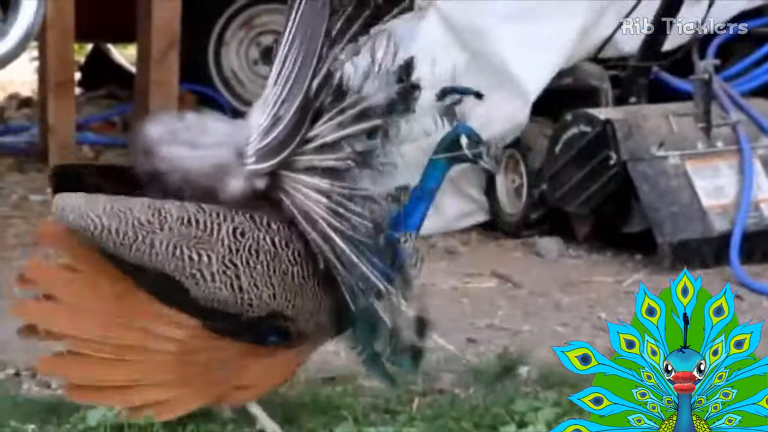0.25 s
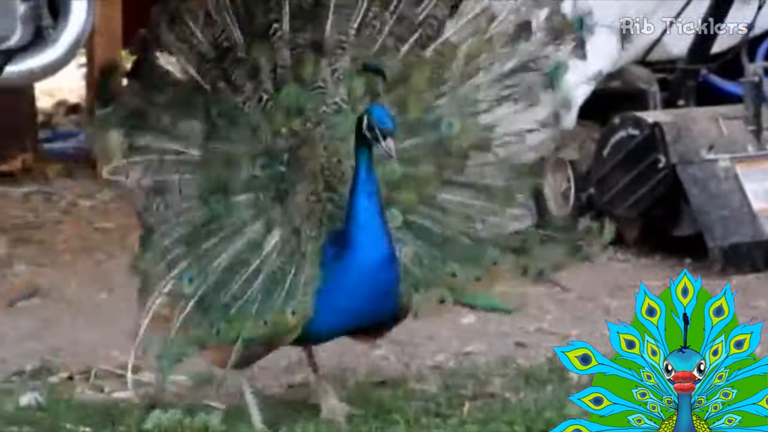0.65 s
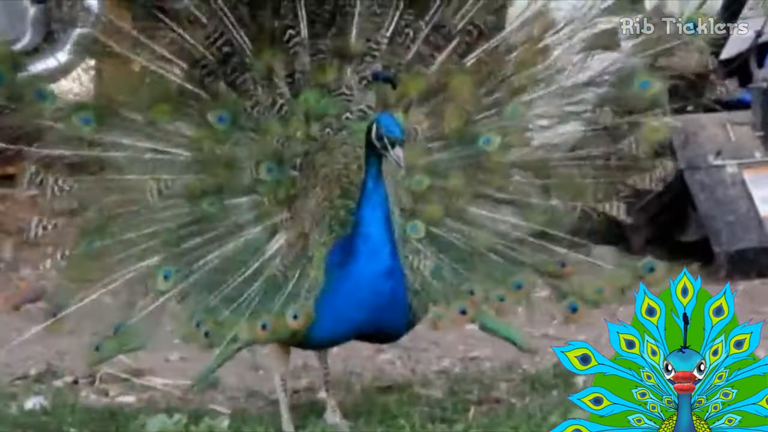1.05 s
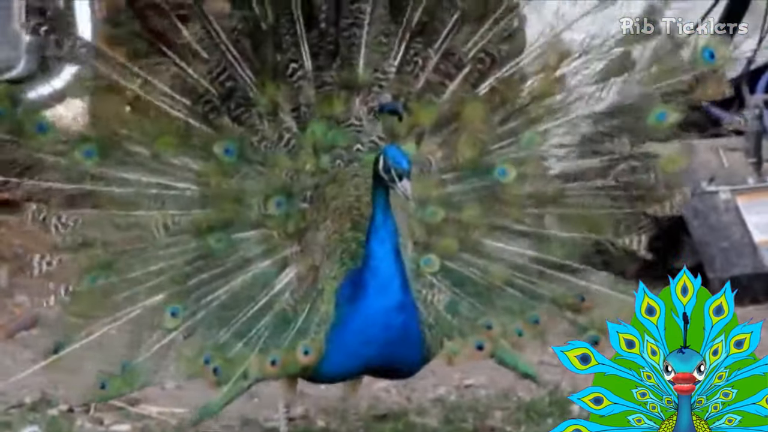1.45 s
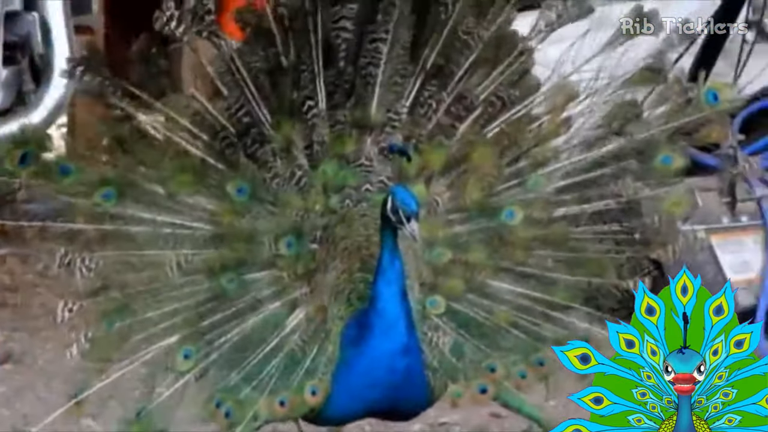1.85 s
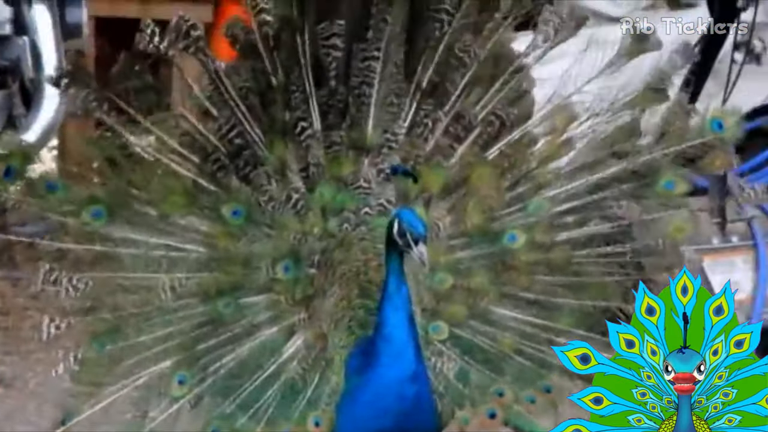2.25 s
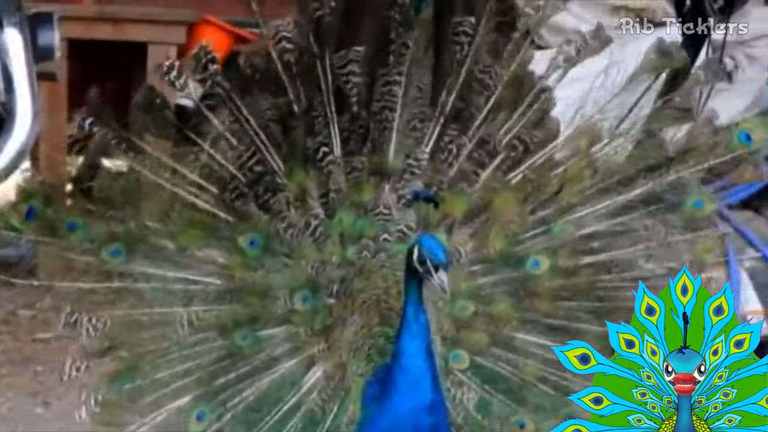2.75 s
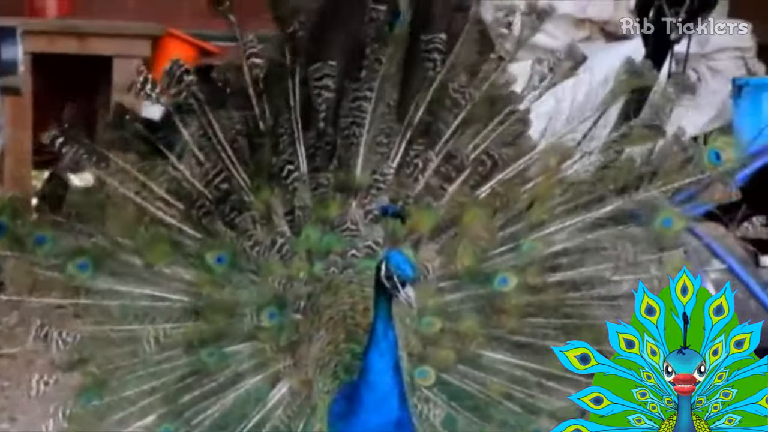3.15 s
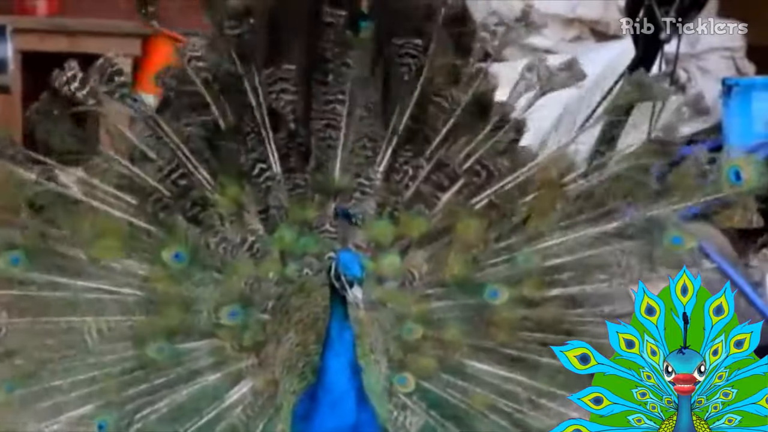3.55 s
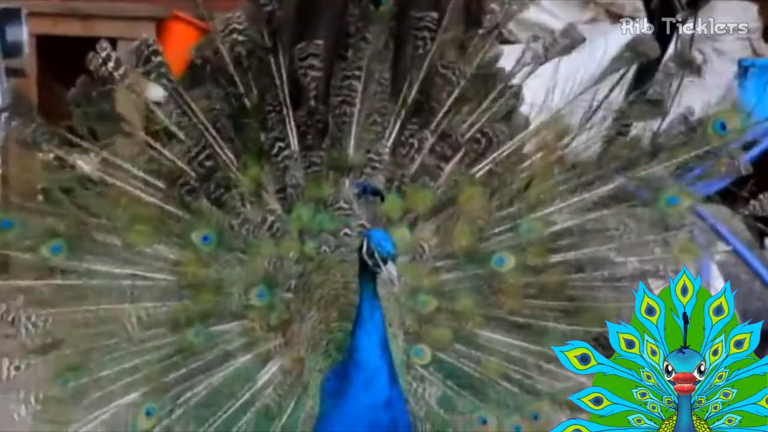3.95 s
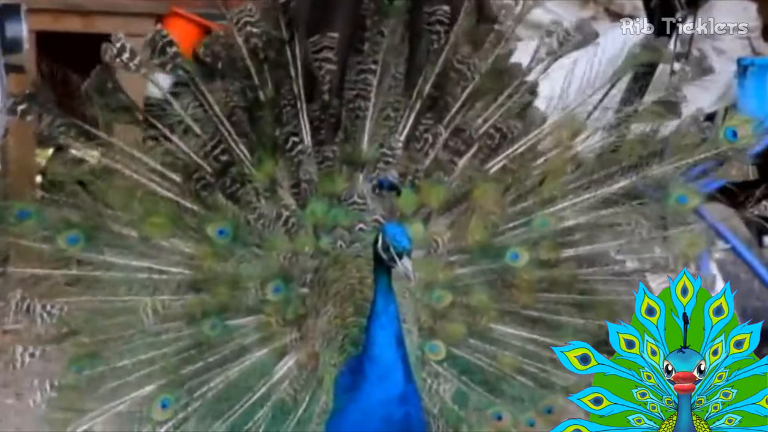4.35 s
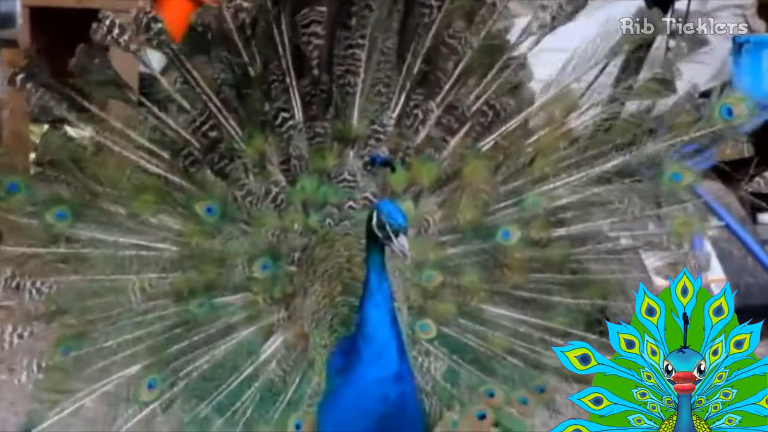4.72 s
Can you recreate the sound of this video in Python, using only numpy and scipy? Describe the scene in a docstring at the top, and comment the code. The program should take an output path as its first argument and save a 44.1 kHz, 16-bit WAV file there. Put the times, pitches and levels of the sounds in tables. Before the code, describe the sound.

A peacock rustles and knocks its feathers as it turns, then shivers its raised train in a dry, hissing, rattling shimmer, heard almost entirely on the left.

```python
"""Peacock shivering his train

A peacock swings round in a yard, brushing and fluttering his feathers, then shivers his raised train.
Shafts patter and barbs hiss, built from thousands of random tiny impacts a second that follow his effort;
a close reflection hollows the rustle, lower as he steps nearer. Quills knock and tick as damped pulses.
Filtered noise makes the open air and the waft of the fan; wavering sines make a faint hum and a far bird.
Nearly all of it sits on the left, over hiss in both channels."""
import sys
import numpy as np
from scipy import signal
from scipy.fft import rfft, irfft, next_fast_len
from scipy.io import wavfile
from scipy.ndimage import uniform_filter1d, map_coordinates

SR = 44100
rng = np.random.default_rng(int(sys.argv[2]) if len(sys.argv) > 2 else 0)


def pcm_store(signal):
    """Save signal as 16-bit PCM."""
    levels = np.round(np.clip(np.atleast_2d(signal), -1, 1) * 32767)
    wavfile.write(sys.argv[1], SR, levels.astype(np.int16).T)


N = 219822
T = np.arange(N) / SR  # time in seconds


def undb(db):
    """Turn decibels into gain."""
    return 10 ** (np.asarray(db) / 20)


def unit(x):
    """Scale to rms 1."""
    return x / np.sqrt(np.mean(x ** 2))


def curve(rows):
    """Join (time_s, value) points by straight lines."""
    time_s, value = np.transpose(rows)
    return np.interp(T, time_s, value)


def ramp(start_s, rise_s):
    """Climb from 0 to 1 in a straight line, then hold."""
    return np.clip((T - start_s) / rise_s, 0, 1)


def colour(x, points):
    """Shape a spectrum by (pitch_hz, level_db) points joined over log frequency; rms 1."""
    point_hz, point_db = np.transpose(points)
    size = next_fast_len(N)
    bin_hz = np.maximum(np.fft.rfftfreq(size, 1 / SR), 1)
    gain = undb(np.interp(np.log(bin_hz), np.log(point_hz), point_db))
    return unit(irfft(rfft(x, size) * gain, size)[:N])


def split(x, hz):
    """Part a sound into what lies below and above a frequency."""
    lowpass = signal.butter(N=4, Wn=hz, fs=SR, output="sos")
    low = signal.sosfiltfilt(lowpass, x)
    return low, x - low


def walk(rate_hz):
    """Smooth random drift of rms 1: random steps at the given rate, averaged twice."""
    size = int(SR / rate_hz)
    steps = np.repeat(rng.standard_normal(N // size + 1), size)
    smooth = uniform_filter1d(uniform_filter1d(steps, size), size)
    return unit(smooth[:N])


def contacts(per_s, spread_db):
    """Tiny impacts at random moments, most weak and a few strong."""
    happens = rng.random(N) < per_s / SR
    strength = undb(spread_db * np.minimum(rng.exponential(size=N), 5))
    return unit(happens * strength * rng.choice([-1, 1], N))


# spectrum of the open air: pitch_hz, level_db (relative)
AIR_SPECTRUM = [(30, -3), (90, 25.5), (200, 9), (600, 18.5), (1500, 15), (3000, -12), (6000, -16),
                (12000, -56)]
HUM_HZ = 152.3
# the hum comes forward near the end
HUM_DB, HUM_SWELL_DB, HUM_SWELL_S, HUM_RISE_S = -58.5, 5.5, 4.06, 0.35


def yard(air_db=-53, drift_db=2.0, waver_db=1.8):
    """Open air as drifting coloured noise, and a motor hum as one sine of wavering pitch and level."""
    air = colour(rng.standard_normal(N), AIR_SPECTRUM) * undb(air_db + drift_db * walk(2.54))
    hum_hz = HUM_HZ * (1 + 0.025 * walk(30))
    hum = unit(np.sin(2 * np.pi * np.cumsum(hum_hz) / SR))
    hum_db = HUM_DB + HUM_SWELL_DB * ramp(HUM_SWELL_S, HUM_RISE_S) + waver_db * walk(10)
    return air + hum * undb(hum_db)


# feathers brushing as he turns: peak_s, rise_s, fade_s, level_db, treble_db (added above the split)
BRUSH_STROKES = [(.004, 0.01, 0.017, -26, 3), (.1, 0.14, 0.078, -36.5, 4), (0.176, 0.014, 0.037, -28, 6),
                 (.298, 0.041, 0.037, -32.5, -4.5), (0.478, 0.024, 0.0057, -34.5, -2),
                 (0.522, 0.019, 0.025, -29.5, 1), (0.606, 0.0054, 0.047, -31.5, 2.5),
                 (0.661, 0.0027, 0.008, -29.5, 8.5), (.742, 0.076, 0.036, -30, 0.5),
                 (0.79, 0.0063, 0.021, -31.5, 1)]
# spectrum of the brushing: pitch_hz, level_db (relative)
BRUSH_SPECTRUM = [(100, 1.5), (220, 4.5), (400, 3.5), (700, 0.5), (1500, -3), (2400, -4), (3300, -8),
                  (4800, -13.5), (7000, -10.5), (9500, -12.5), (13000, -55)]


def brushes(per_s=12000, spread_db=3.0):
    """Feathers slide over each other in short crackling strokes of dense contacts."""
    body, edge = split(colour(contacts(per_s, spread_db), BRUSH_SPECTRUM), 3650)
    body_power, edge_power = 0, 0
    for s, rise, fade, db, treble_db in BRUSH_STROKES:
        stroke = undb(db) * np.exp(-np.maximum((s - T) / rise, (T - s) / fade))
        body_power = body_power + stroke ** 2
        edge_power = edge_power + (stroke * undb(treble_db)) ** 2
    return body * np.sqrt(body_power) + edge * np.sqrt(edge_power)


def snap(s, db, hz, cycles):
    """One contact on a light, well damped quill: a brief cosine pulse under a bell-shaped envelope."""
    out = np.zeros(N)
    near = np.abs(T - s) < .01
    turns = hz * (T[near] - s)
    out[near] = -undb(db) * np.exp(-(turns / cycles) ** 2) * np.cos(2 * np.pi * turns)
    return out


# quills knocking together as the train swings up: peak_s, peak_db (before the dulling filter),
# pitch_hz, ring_cycles
QUILL_KNOCKS = [(.1771, -20, 900, .5), (0.2655, -4.5, 1700, .2), (0.2676, -13.5, 700, .25),
                (.3076, -26.5, 1500, .4), (.61, -24, 302, 0.37), (.634, -31, 520, 1.2),
                (.6697, -25, 1200, .3), (.688, -22, 260, 0.38), (.704, -25, 514, 0.55),
                (.731, -29, 600, 0.8), (0.738, -16, 500, 0.6), (.742, -29, 1000, .7), (0.75, -29, 260, 0.5),
                (0.7567, -24, 290, 0.6), (0.7702, -28, 300, 0.35), (0.7812, -12.5, 1300, 0.2),
                (0.7822, -17.5, 480, 0.52), (0.7918, -23, 700, 0.3), (.811, -44, 600, 0.42)]
# the sharpest ticks of feather tips: peak_s, peak_db, pitch_hz
TIP_TICKS = [(0.175, -13, 6690), (0.523, -27, 7090), (.6074, -29, 5970), (0.659, -27, 8850),
             (0.66, -25, 6600), (1.4809, -22, 5930), (1.8172, -19, 6060), (2.0818, -21, 6120),
             (2.6755, -15, 5880), (2.7484, -17, 7200), (2.8263, -13, 6400), (2.8654, -22, 5560),
             (3.095, -22, 6000), (3.3266, -16, 5790), (3.599, -14, 6000), (3.6387, -10, 6230),
             (3.6752, -13.5, 5580), (3.7157, -17, 5510), (3.7392, -22, 6120), (4.2611, -27, 5980),
             (4.6057, -20, 6300), (4.611, -21, 6170)]
# spectrum of the train's feathers, for tip chatter and for the shiver: pitch_hz, level_db (relative)
TRAIN_SPECTRUM = [(60, -9), (150, -4), (260, -4), (380, -2.5), (900, -2.5), (1700, -0.5), (2300, 0.44),
                  (3200, 0.5), (4400, 1.8), (6200, 3), (7300, -1.5), (8500, -4), (9700, -7.5),
                  (10400, -21.5), (11000, -37), (13000, -35)]
TICK_CYCLES = 1
KNOCK_TOP_HZ = 4240  # a knock is steeply dulled above this


def quills(chatter_db=-12, chatter_s=0.00095):
    """Thick bases knock dully, each at its own pitch; thin tips tick and chatter briefly as they rebound."""
    dull = signal.butter(N=12, Wn=KNOCK_TOP_HZ, fs=SR, output="sos")
    knocks = signal.sosfiltfilt(dull, sum(snap(*knock) for knock in QUILL_KNOCKS))
    ticks = sum(snap(s, db, hz, TICK_CYCLES) for s, db, hz in TIP_TICKS)
    rebound = sum(undb(db) * (T > s) * np.exp(-np.abs(T - s) / chatter_s) for s, db, _ in TIP_TICKS)
    chatter = unit(split(colour(contacts(8800, 5.2), TRAIN_SPECTRUM), 4200)[1])
    return knocks + ticks + undb(chatter_db) * rebound * chatter


# wing and tail vanes flapping in the air: peak_s, flap_rate_hz, level_db
VANE_FLUTTERS = [(.281, 240, -38.5), (.316, 253, -33), (.385, 250, -47), (0.452, 238, -46), (.51, 170, -41),
                 (.686, 117.5, -39.5), (.762, 219.7, -32), (3.58, 278, -37.5)]
FLUTTER_CYCLES = 4.6  # flaps from the height of a flutter until it has fallen to 1/e


def flutters(uneven=0.131, overtone=0.15):
    """A vane flaps for a few uneven cycles: a soft low purr of four harmonics."""
    clock = np.cumsum(1 + uneven * walk(150)) / SR  # time that hurries and lags
    out = np.zeros(N)
    for s, hz, db in VANE_FLUTTERS:
        half = FLUTTER_CYCLES / hz
        near = np.abs(T - s) < 4 * half
        phase = 2 * np.pi * hz * clock[near]
        flap = unit(sum(overtone ** k * np.cos(k * phase) for k in range(1, 5)))
        out[near] += undb(db) * flap * np.exp(-((T[near] - s) / half) ** 2)
    return out


# the hollow a close reflection cuts, sinking as he steps nearer: time_s, hollow_hz
HOLLOW_PATH = [(1.0, 3450), (2.6, 3100), (4.6, 3000)]
REFLECTION_DB = -7


def reflected(x):
    """Add an echo half a cycle late at the hollow's frequency, so it partly cancels the sound there."""
    delay_s = .5 / curve(HOLLOW_PATH)
    echo = map_coordinates(x, [(T - delay_s) * SR], order=3, mode="nearest")
    return x + undb(REFLECTION_DB) * echo


# how hard he shivers the train: time_s, level_db (before the shaft and barb gains)
SHIVER_EFFORT = [(0.8, -41.5), (0.93, -36.5), (1.08, -37.5), (1.32, -38.7), (1.66, -37.5), (1.8, -37.5),
                 (2.34, -41.5), (2.65, -35), (2.87, -39.5), (3.04, -38.5), (3.11, -36), (3.18, -39),
                 (3.23, -41), (3.275, -37), (3.335, -36.5), (3.375, -38.5), (3.46, -37), (3.54, -37),
                 (3.63, -33), (3.76, -37.5), (3.81, -43.5), (3.85, -41.5), (3.93, -43.5), (4.0, -49.5),
                 (4.08, -47.5), (4.19, -53.5), (4.27, -50), (4.49, -44), (4.55, -39), (4.78, -42.5),
                 (4.9, -43.5), (4.98, -37.5)]
SHIVER_START_S, SHIVER_RISE_S = 0.63, 0.18


def shiver(beat_hz=26.57, wander=.012, harmonic_depths=(0.046, 0.047, 0.046),
           per_s=12000, spread_db=1.82, violence=0.13, barb_db=5.5, shaft_db=3,
           shaft_growth=0.038, shaft_patchy_db=0.5, barb_patchy_db=1.0):
    """The train swings to and fro; its feathers clash hardest once a swing, with fainter ripples between."""
    phase = 2 * np.pi * np.cumsum(beat_hz * (1 + wander * walk(2.2))) / SR
    swing = 1 + sum(depth * np.cos(k * phase) for k, depth in enumerate(harmonic_depths, 1))
    effort_db = curve(SHIVER_EFFORT)
    # the harder he shakes, the more single contacts stand out and the more the shafts join in
    extra_db = effort_db - np.median(effort_db)
    spread = spread_db + violence * extra_db
    # stiff shafts give the low patter, fine barbs the hiss
    shaft_hits = colour(contacts(per_s / 2, spread) * swing, TRAIN_SPECTRUM)
    barb_hits = colour(contacts(per_s, spread) * swing, TRAIN_SPECTRUM)
    shafts = unit(reflected(split(shaft_hits, 2780)[0]))
    barbs = unit(reflected(split(barb_hits, 2760)[1]))
    shafts *= undb(shaft_db + shaft_growth * extra_db + shaft_patchy_db * walk(35.02))
    barbs *= undb(barb_db + barb_patchy_db * walk(220))
    return (shafts + barbs) * undb(effort_db) * ramp(SHIVER_START_S, SHIVER_RISE_S)


# spectrum of the air the opening fan pushes aside: pitch_hz, level_db (relative)
WAFT_SPECTRUM = [(60, -25), (130, -7), (220, -1), (380, -3), (600, -17), (1200, -33), (3000, -70)]
WAFT_S, WAFT_RISE_S, WAFT_FADE_S, WAFT_DB = 0.765, .04, .2, -37


def waft():
    """A soft low rush of noise as the train comes upright, dying away as it settles."""
    swell = np.exp(-np.maximum((WAFT_S - T) / WAFT_RISE_S, (T - WAFT_S) / WAFT_FADE_S))
    return undb(WAFT_DB) * swell * colour(rng.standard_normal(N), WAFT_SPECTRUM)


# a far bird's notes: start_s, length_s, first_pitch_hz, last_pitch_hz, level_db (before roughness and echoes)
BIRD_NOTES = [(4.19, .14, 1045, 1055, -52.5), (4.67, .31, 745, 815, -47.3)]


def far_bird(waver=0.0109, rough_db=4.0, echo_s=.015, echo_db=-9):
    """Hoarse thin notes bend upwards; distance takes their overtones and scattered echoes blur them."""
    out = np.zeros(N)
    wobble = 1 + waver * walk(160)
    for s, length, first_hz, last_hz, db in BIRD_NOTES:
        along = np.clip((T - s) / length, 0, 1)
        hz = (first_hz + (last_hz - first_hz) * along) * wobble
        swell = np.sqrt(2 * np.abs(np.sin(np.pi * along)))
        out += undb(db) * swell * np.sin(2 * np.pi * np.cumsum(hz) / SR)
    out *= unit(undb(rough_db * walk(110)))
    echoes = rng.standard_normal(N) * np.exp(-T / echo_s)
    echoes /= np.linalg.norm(echoes)
    return out + undb(echo_db) * signal.fftconvolve(out, echoes)[:N]


def place(x, right_db):
    """Full on the left, faint on the right."""
    return np.array([x, undb(right_db) * x])


def scene():
    """The peacock close by, the yard and the far bird behind him."""
    near = brushes() + quills() + flutters() + shiver() + waft()
    return place(near + far_bird() + yard(), right_db=-50)


# spectrum of the input hiss: pitch_hz, level_db (relative)
HISS_SPECTRUM = [(20, 17), (60, 12), (120, 6), (500, 6.5), (3000, 4), (8000, 4), (10000, -1.5),
                 (13000, -23)]
# the signal rests off zero; this offset drops twice, creeping back up after each drop:
# time_s, offset (share of full scale, left channel)
RESTING_OFFSET = [(0, .13), (.265, .115), (.267, .075), (3.6, .105), (3.69, .082), (4.98, .095)]
TOP_HZ = 13000


def record(dry, hiss_db=-47.5, right_offset=.43):
    """Add separate hiss to each channel, cut the top steeply, then shift both by the resting offset."""
    hiss = undb(hiss_db) * np.array([colour(rng.standard_normal(N), HISS_SPECTRUM) for _ in range(2)])
    top = signal.ellip(8, .2, 70, TOP_HZ, fs=SR, output="sos")
    return signal.sosfilt(top, dry + hiss) + np.outer([1, right_offset], curve(RESTING_OFFSET))


dry = scene()
out = record(dry)
pcm_store(out)
```